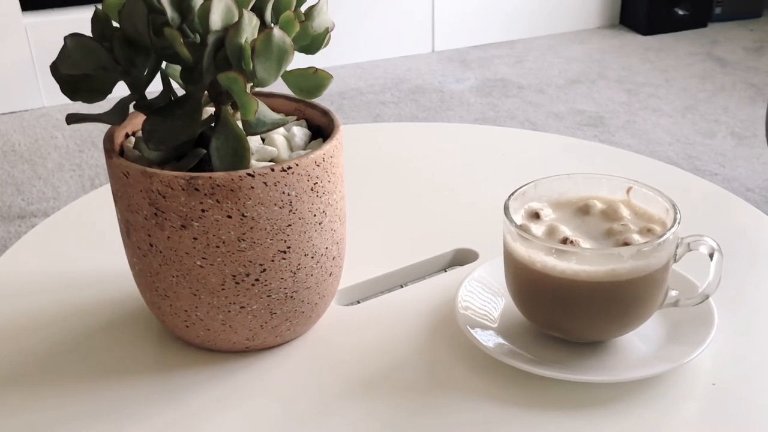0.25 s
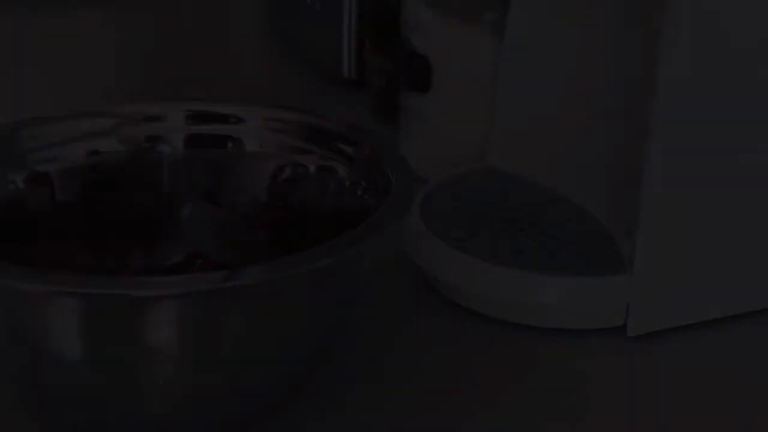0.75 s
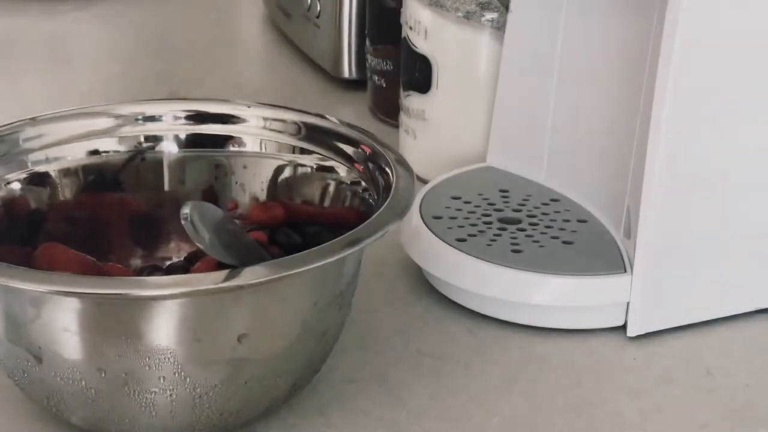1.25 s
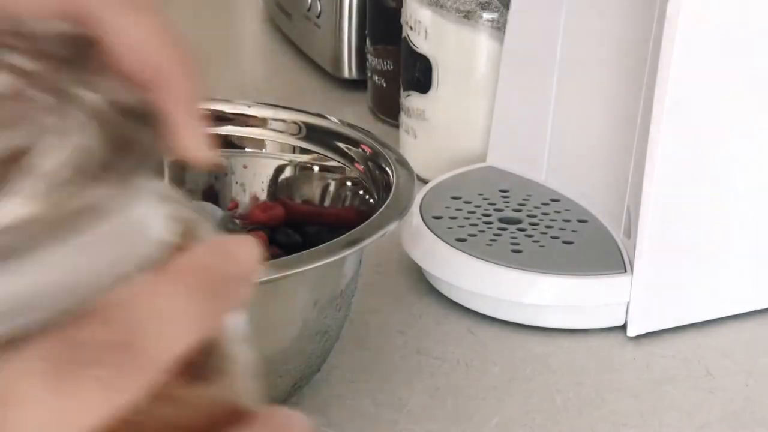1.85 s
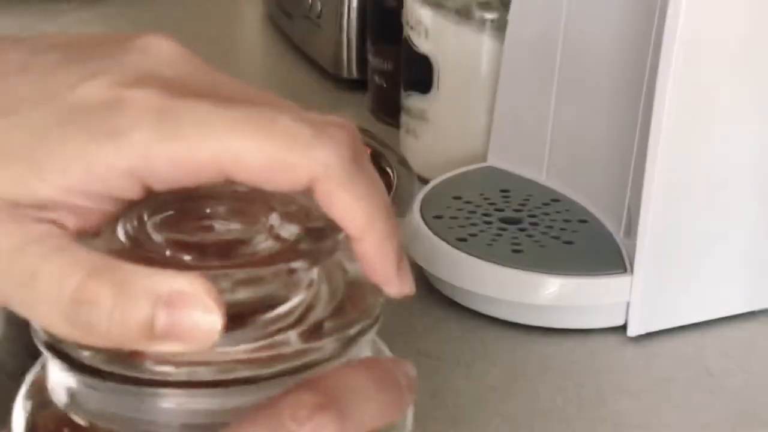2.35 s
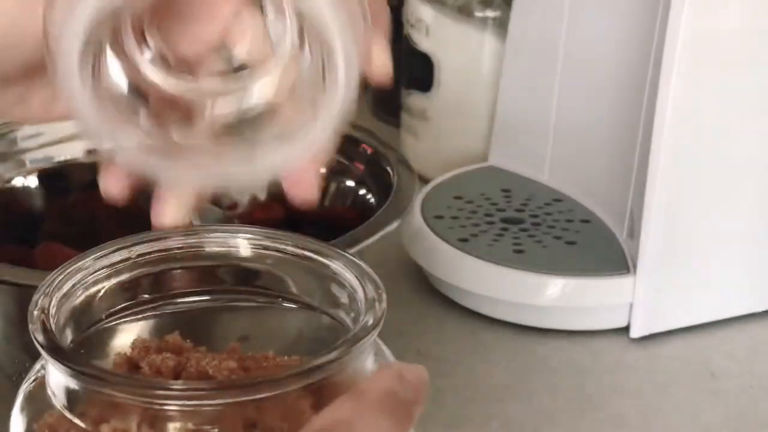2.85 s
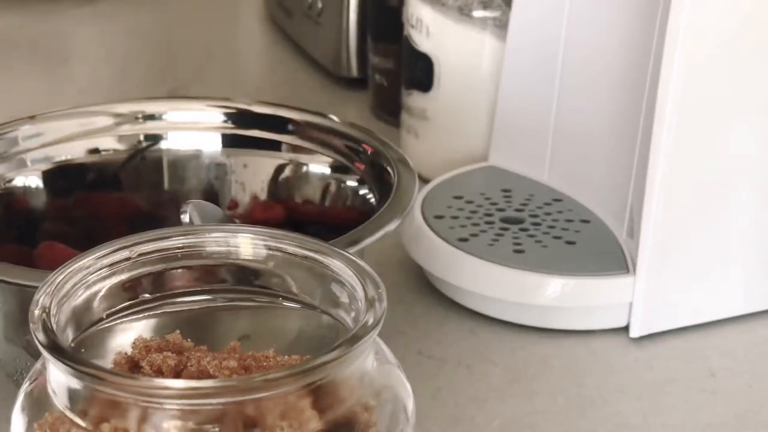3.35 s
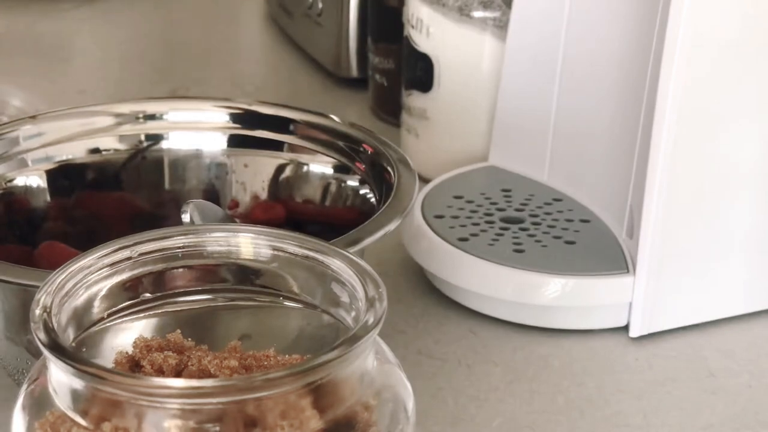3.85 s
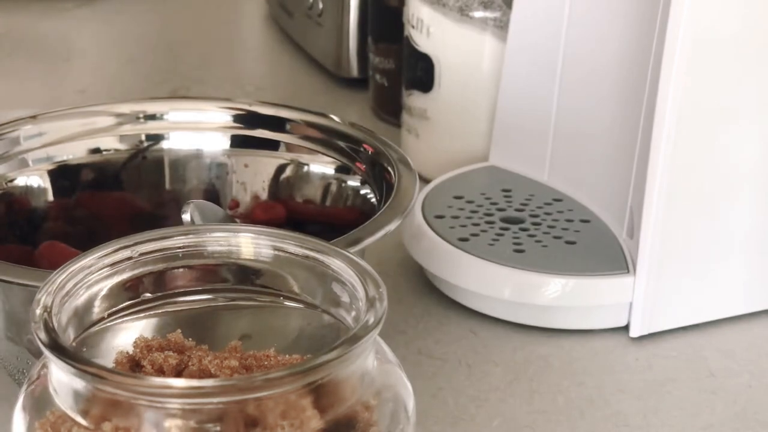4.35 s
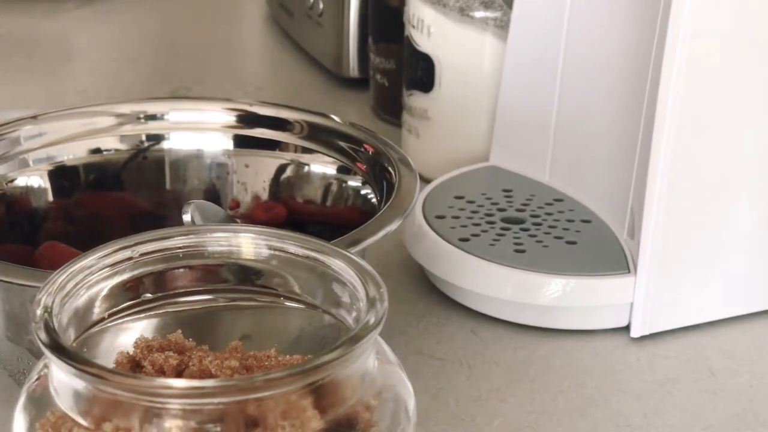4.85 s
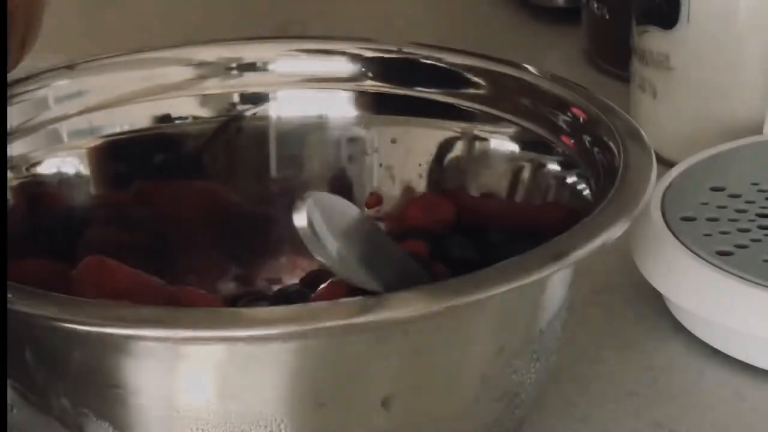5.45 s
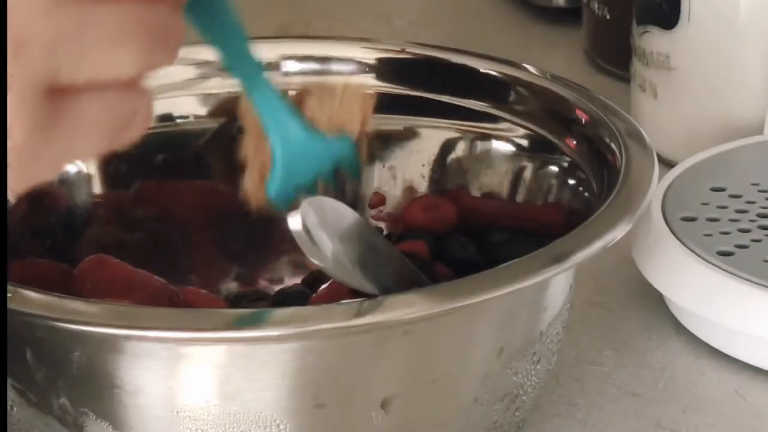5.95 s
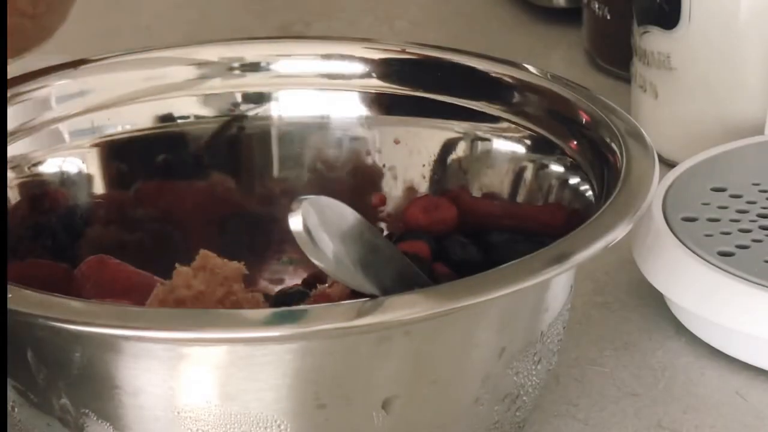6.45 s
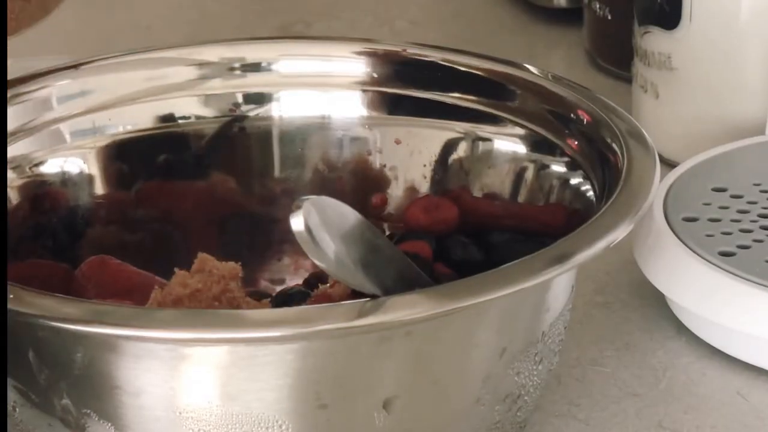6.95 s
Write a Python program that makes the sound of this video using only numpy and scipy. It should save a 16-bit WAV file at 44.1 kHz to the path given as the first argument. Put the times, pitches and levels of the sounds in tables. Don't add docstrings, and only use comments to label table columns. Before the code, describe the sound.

Very quiet room air with a faint thin squeak cuts abruptly to a low kitchen hum. Cloth and fingers rustle, a full glass jar thuds hard on the counter, and its lid pops open. The lid is laid aside in three low, glassy knocks with rumbling and gritty scraping. Finally a spoon gives one bright, short clink on a steel bowl, then a small light tap. Close microphone, small kitchen with short reverberation.

```python
import sys
import numpy as np
from scipy import signal
from scipy.fft import rfft, irfft, next_fast_len
from scipy.io import wavfile
from scipy.ndimage import uniform_filter1d

SR = 44100
rng = np.random.default_rng(int(sys.argv[2]) if len(sys.argv) > 2 else 0)


def volts_from_decibels(level):
    exponent = np.asarray(level, float) / 20
    return 10 ** exponent


def materialize(psi):
    bounded = np.clip(np.atleast_2d(psi).T, -1, 1)
    quanta = np.round(bounded * 32767).astype(np.int16)
    wavfile.write(sys.argv[1], SR, quanta)


N = 318181
KITCHEN_CUT_S, BOWL_CUT_S = 0.654, 4.93


def evened(x):
    return x / np.sqrt(np.mean(x ** 2) + 1e-20)


def read(points, hz):
    f, value = np.transpose(points)
    return np.interp(np.log(hz + 1), np.log(f + 1), value)


def add(mix, s, sound):
    part = mix[round(s * SR):][:len(sound)]
    part += sound[:len(part)]


def noise(spectrum, size):
    hz = np.fft.rfftfreq(size, 1 / SR)
    white = rfft(rng.standard_normal(size))
    return evened(irfft(white * volts_from_decibels(read(spectrum, hz)), size))


def long_noise(spectrum):
    return noise(spectrum, next_fast_len(N))[:N]


def flicker(samples, size):
    once = uniform_filter1d(rng.standard_normal(size), samples)
    return evened(uniform_filter1d(once, samples))


def fuzzy(hz, width_hz):
    r = np.exp(-np.pi * width_hz / SR)
    poles = [1, -2 * r * np.cos(2 * np.pi * hz / SR), r * r]
    return evened(signal.lfilter([1], poles, rng.standard_normal(N)))


# f/Hz, t60/s
TAIL_T60 = [(100, 0.87), (300, 0.28), (1000, 0.32), (3000, 0.28), (8000, 0.21), (15000, 0.15)]


def tail(spectrum, stretch, size):
    t, hz = np.arange(size) / SR, np.fft.rfftfreq(size, 1 / SR)
    z, out = rfft(noise(spectrum, size)), np.zeros(size)
    for centre_hz in 60 * 2. ** np.arange(9):
        band = np.maximum(1 - abs(np.log2((hz + 1) / centre_hz)), 0)
        swelling = 1 - np.exp(-(t * (centre_hz + 100) * 0.34) ** 2)
        decay = volts_from_decibels(-60 * t / (stretch * read(TAIL_T60, centre_hz)))
        out += irfft(z * band, size) * swelling * decay
    return out


# f/Hz, density/dB per Hz
FLAT = [(50, 0), (20000, 0)]


def echoed(ring, stretch):
    walls = tail(FLAT, stretch, size=8000)
    return signal.fftconvolve(ring, walls / np.linalg.norm(walls))[:len(ring)]


# f/Hz, density/dB per Hz
LIVING = [(12, -52), (20, -17), (50, -5.5), (130, 4), (198, -8.5), (234, -6), (558, -17), (1120, -23),
          (1260, -20), (1370, -26), (1570, -23), (2020, -29), (13500, -36), (16000, -37)]
KITCHEN = [(12, -54), (20, -16), (48, -10), (88, 2), (134, -7), (255, -19.5), (285, -13), (422, -18.5),
           (459, -22), (624, -22), (825, -25), (1120, -25), (1480, -31.5), (12400, -48.5), (16000, -48.5)]
LIVING_DB, KITCHEN_DB = -61, -52
# f/Hz, width/Hz, level/dB
HUM_BODY = [(58.8, 8.2, -60), (83.9, 11, -56.5), (140, 22.4, -57), (299.5, 26, -68), (632, 73, -92.5),
            (1130, 29, -82)]
# f/Hz, level/dB
WHINES = [(1297, -79.5), (3020, -87), (1190, -87.5), (4300, -90)]


def hum():
    t = np.arange(N) / SR
    kitchen = volts_from_decibels(KITCHEN_DB - 3) * long_noise(KITCHEN)
    for hz, width_hz, db in HUM_BODY:
        kitchen += volts_from_decibels(db) * fuzzy(hz, width_hz)
    for hz, db in WHINES:
        kitchen += volts_from_decibels(db + 2 + 3.1 * flicker(2000, N)) * np.sin(2 * np.pi * hz * t)
    return np.where(t < KITCHEN_CUT_S, volts_from_decibels(LIVING_DB) * long_noise(LIVING), kitchen)


# start t/s, length t/s, f/Hz, level/dB
SQUEAKS = [(0, 0.16, 1560, -77), (0, 0.62, 1297, -81.5), (0.666, 0.73, 3020, -81.5),
           (4.457, 0.48, 3020, -76.5), (0.512, 0.14, 1564, -76.5), (0.664, 0.19, 5830, -83),
           (.78, .1, 6800, -83), (0.67, 0.15, 4000, -79), (1.46, .15, 8700, -82), (2.385, .05, 14150, -80),
           (2.415, .098, 14000, -70), (2.859, 0.14, 6100, -80), (4.158, 0.045, 6160, -69),
           (4.2, .075, 6140, -76), (4.205, 0.048, 6800, -80), (5.58, 0.086, 8500, -77),
           (6.166, 0.14, 6370, -78), (6.263, 0.085, 6410, -72), (6.33, 0.11, 6370, -85),
           (6.948, 0.14, 5980, -86), (7, 0.037, 7750, -84), (7.06, 0.1, 8500, -82)]


def squeaks(mix):
    for s, length_s, hz, db in SQUEAKS:
        t = np.arange(round(length_s * SR)) / SR
        waver = volts_from_decibels(min(hz / 1800, 4.0) * flicker(250, len(t)))
        turns = hz * t + 0.054 * flicker(150, len(t))
        fade = signal.windows.tukey(len(t), min(hz / 9000, .5))
        add(mix, s, volts_from_decibels(db + 3) * waver * np.sin(2 * np.pi * turns) * fade)


def swell(t, start, peak, end, db):
    peak = max(peak, start + .004)
    up = np.sin(np.pi / 2 * np.clip((t - start) / (peak - start), 0, 1)) ** 1.9
    down = np.exp(-(2.08 * np.maximum(t - peak, 0) / max(end - peak, .02)) ** 1.57)
    return volts_from_decibels(db) * up * down * ((t < BOWL_CUT_S) | (start > BOWL_CUT_S))


def patchy(x):
    z = signal.stft(x, nperseg=256)[2]
    patches = uniform_filter1d(rng.standard_normal(z.T.shape), 20, 0)
    patches = uniform_filter1d(patches, 4, 1)
    return signal.istft(z * volts_from_decibels(2 * evened(patches.T)), nperseg=256)[1][:len(x)]


# f/Hz, density/dB per Hz
CLOTH = [(3500, -2.5), (5500, 4.5), (8000, 2), (12500, 0.5), (16000, -5.5)]
SKIN = [(600, 3.5), (1000, 6.5), (2000, 3), (3200, 1), (5000, -9), (7000, -24.5)]
RUMBLE = [(60, -22), (120, 14), (200, 2), (330, 4.5), (550, -6.5), (800, -4), (1200, -43.5)]
SILK = [(5000, -29), (7500, -2), (9000, -2.5), (10500, -0.5), (12500, 3), (14000, -3), (16000, -6)]
# t/s, effort level/dB
EFFORT = [(.66, -79), (.95, -84), (1.4, -78), (2.1, -59), (2.42, -68.5), (2.75, -80), (3.0, -66.5),
          (3.35, -60.5), (3.6, -69.5), (3.92, -40.5), (4.2, -45), (4.45, -49.5), (4.62, -50.5),
          (4.925, -57.5), (4.935, -73), (5.4, -63), (5.95, -78), (7.21, -65.5)]
# level/dB at full effort, slope/dB per dB
FOLLOW = [
    (-70.5, 0.32),
    (-59.5, 0.47),
    (-47, 0.97),
]
FULL_EFFORT_DB = -44.5
# start t/s, peak t/s, end t/s, level/dB
SWISHES = [(.68, .71, 0.74, -76), (1.172, 1.19, 1.37, -67), (1.278, 1.292, 1.39, -62),
           (1.36, 1.51, 1.9, -68.5), (1.55, 1.87, 2.5, -62), (1.88, 1.92, 1.88, -58),
           (2.29, 2.355, 2.47, -61.5), (2.42, 2.45, 3.6, -74), (2.51, 2.545, 2.57, -59),
           (2.59, 2.635, 2.74, -66), (2.77, 2.83, 2.95, -73), (2.85, 2.97, 3.4, -75),
           (3.11, 3.165, 3.36, -71), (3.24, 3.34, 3.67, -63), (3.39, 3.47, 3.54, -55), (3.63, 3.69, 4, -69),
           (3.95, 3.985, 4.04, -62), (4.1, 4.115, 4.17, -61), (4.565, 4.58, 4.85, -64),
           (4.7, 4.89, 6, -62.5), (4.935, 5.14, 6.7, -68.5), (5.228, 5.245, 5.45, -59),
           (6.83, 6.85, 7, -66), (6.95, 7.07, 7.15, -78)]
SCRAPES = [(1.158, 1.18, 2.3, -71.5), (1.866, 1.915, 2.01, -55), (2.302, 2.356, 2.44, -60.5),
           (2.521, 2.55, 2.7, -64), (3.258, 3.34, 3.7, -62), (3.368, 3.41, 3.5, -57.5),
           (3.936, 3.977, 4.08, -54), (4.033, 4.083, 4.26, -57.5), (4.555, 4.577, 4.68, -54),
           (4.803, 4.914, 5.4, -66), (5.232, 5.249, 5.29, -52.5), (5.548, 5.75, 6.3, -73)]
SHOVES = [(2.22, 2.302, 2.5, -47), (2.562, 2.617, 2.57, -58), (3.31, 3.343, 4.1, -55),
          (3.38, 3.438, 3.47, -53), (3.527, 3.573, 2.6, -58), (3.895, 3.938, 3.88, -38),
          (4.034, 4.098, 4.18, -40), (4.5, 4.543, 4.74, -47), (4.575, 4.622, 4.7, -43.5),
          (4.7, 4.78, 4.99, -52.5)]
BRUSHES = [(1.164, 1.186, 1.1, -70), (1.265, 1.293, 1.42, -61.5), (1.7, 1.903, 1.75, -62),
           (2.143, 2.152, 2.2, -54), (2.81, 2.83, 2.9, -69), (3.14, 3.165, 3.44, -70),
           (3.43, 3.468, 3.62, -60.5), (3.98, 4.01, 3.8, -66), (4.12, 4.137, 4.2, -55),
           (4.24, 4.265, 3.9, -70), (4.417, 4.43, 4.66, -64), (4.6, 4.635, 4.76, -69),
           (7.04, 7.08, 7.12, -75.5)]


def hands():
    t = np.arange(0, N + 64, 64) / SR
    now = np.arange(N) / SR
    effort_db = np.interp(t, *np.transpose(EFFORT)) - FULL_EFFORT_DB
    cloth, skin, counter = (volts_from_decibels(db + slope * effort_db) ** 2 for db, slope in FOLLOW)
    swish, scrape, shove, brush = (sum(swell(t, *row) ** 2 for row in rows)
                                   for rows in (SWISHES, SCRAPES, SHOVES, BRUSHES))
    skin_in_swish = volts_from_decibels(2 * -9.5) * swish
    layers = [  # colour, power, grain dB, grain samples
        (CLOTH, cloth + swish, 1.2, 30),
        (SKIN, skin + scrape + skin_in_swish, 1.74, 80),
        (RUMBLE, counter + shove, 2.2, 400),
        (SILK, brush, 1.1, 30)]
    rub = 0
    for colour, power, grain_db, grain_n in layers:
        level = np.interp(now, t, np.sqrt(power))
        rub = rub + long_noise(colour) * level * volts_from_decibels(grain_db * flicker(grain_n, N))
    return patchy(rub) * (now > KITCHEN_CUT_S)


def tick(s, db, hz, second_hz, t60, tail_db):
    t = np.arange(8000) / SR
    low, high = sorted((hz, second_hz))
    rise = 1 - np.exp(-(t * low * 1.57) ** 2)
    ring = np.sin(2 * np.pi * hz * t) + 0.31 * np.sin(2 * np.pi * second_hz * t)
    ring *= volts_from_decibels(db - 60 * t / t60) * rise
    colour = [(low / 1.8, -30), (low, 0), (high, 0), (high * 2.0, -25), (high * 4, -60)]
    snap = rise * volts_from_decibels(db - 9.0 - 60 * t / 0.0059) * noise(colour, len(t))
    room = volts_from_decibels(tail_db) * tail(colour, 0.31, size=len(t))
    return s, ring + snap + volts_from_decibels(-8.5) * echoed(ring, 0.92) + room


# t/s, peak level/dB, f/Hz, second f/Hz, tail level/dB
HELD = [(1.287, -44, 1130, 4000, -68), (2.251, -42, 3000, 9200, -67), (2.251, -46, 13500, 9200, -65),
        (2.5121, -22, 5550, 4770, -50), (2.5123, -20.5, 2826, 1490, -60), (2.5122, -33, 7600, 9300, -60),
        (2.5165, -23.5, 2650, 1500, -66), (2.5122, -33, 1500, 1100, -66), (2.6365, -33.5, 195, 130, -66),
        (4.523, -29.5, 345, 140, -54), (4.61, -42, 130, 768, -68), (5.2366, -33.5, 1200, 2900, -76),
        (5.2366, -41, 3000, 6500, -66), (6.8036, -34, 1950, 2230, -62), (6.804, -35, 5000, 5500, -60)]
RESTING = [(.620, -44, 5950, 7300, -59), (1.186, -54, 2980, 6500, -68), (2.4455, -53, 5960, 3200, -69),
           (2.4455, -61, 8500, 10500, -75), (2.576, -49, 3080, 3450, -63), (3.43, -48, 1340, 350, -50),
           (4.089, -43, 3300, 3900, -70), (4.27, -52, 2270, 3030, -72), (4.323, -50, 1910, 3380, -56),
           (4.4012, -47, 3160, 1860, -53), (4.4012, -54, 5000, 7000, -68), (4.57, -46, 4570, 7200, -51.5),
           (5.236, -46.5, 6340, 8900, -62), (5.878, -63, 2840, 2330, -68)]
FREE = [(1.2866, -54, 8100, 9100, -60), (2.541, -54, 11500, 9000, -58), (3.327, -50, 8900, 2740, -56.5),
        (3.341, -46.5, 1190, 2690, -70), (3.537, -60, 11100, 6960, -67), (3.9795, -48, 4737, 3200, -69),
        (3.988, -50, 6100, 4730, -62), (4.5696, -39.5, 3180, 1210, -52), (4.111, -50, 6000, 6900, -60),
        (6.8024, -33.5, 6800, 8300, -44.5), (6.803, -39, 15300, 15250, -54), (3.817, -46, 12900, 4300, -58),
        (3.877, -48, 12800, 3000, -62), (5.404, -46, 15400, 13500, -62), (6.8035, -35, 12100, 12900, -50)]
GRIT = [(1.1238, -58, 2990, 4000, -75), (1.298, -52, 11500, 9000, -68), (1.909, -50, 2370, 3500, -62),
        (2.3365, -54, 1520, 3000, -72), (2.9676, -54, 3010, 6000, -75), (3.0953, -55, 2860, 4000, -71),
        (3.4011, -52, 2740, 1500, -66), (3.9792, -40, 2610, 6100, -60), (3.986, -50, 3300, 2300, -64),
        (4.053, -53, 3270, 5500, -68), (4.1153, -48, 2830, 6010, -62), (4.33, -52, 2530, 4500, -68),
        (4.486, -53, 2242, 3100, -64), (4.6097, -48, 2800, 3300, -58), (4.7818, -56, 3100, 2210, -65),
        (5.2545, -47, 4700, 7000, -62)]


def touches(mix):
    for rows, cycles in ((HELD, 12.6), (RESTING, 39), (FREE, 84), (GRIT, 32)):
        for s, db, hz, second_hz, tail_db in rows:
            add(mix, *tick(s, db, hz, second_hz, cycles / hz, tail_db))


def blow(row, modes, crack, lag_s, spread, crack_hz, crack_t60, stretch, soft=2.25):
    s, ring_db, crack_db, tail_db = row
    t, ring = np.arange(16000) / SR, 0
    for hz, db, t60 in modes:
        late = np.maximum(t - lag_s * (500 / hz) ** spread, 0)
        rise = 1 - np.exp(-late * hz * soft)
        ring = ring + volts_from_decibels(db - 60 * late / t60) * rise * np.sin(2 * np.pi * hz * late)
    ring = ring + volts_from_decibels(-18.0) * echoed(ring, 0.4)
    treble = signal.butter(2, crack_hz, "high", fs=SR)
    snap = evened(signal.lfilter(*treble, noise(crack, len(t))))
    contact = 1 - np.exp(-(t / .0003) ** 2)
    snap = snap * volts_from_decibels(crack_db - 60 * t / crack_t60) * contact
    early = 1 + 1.2 * np.exp(-t / .015)
    return s, volts_from_decibels(ring_db) * ring + snap + volts_from_decibels(tail_db) * early * tail(crack, stretch, size=len(t))


# t/s, ring level/dB, crack level/dB, tail level/dB
BOWL_BLOWS = [
    (5.404, -30.5, -38, -44),
    (5.407, -66, -29, -63),
]
SPOON_BLOWS = [
    (5.496, -64, -72, -63),
    (5.5132, -46, -72, -57.5),
    (5.536, -64, -72, -68),
]
LATE_SWELL = (5.518, -47, -80, -70)
# level/dB, t60/s
BOWL_HZ = [120, 673, 1324, 1890, 2415, 3056, 3774, 4490, 4524, 4544, 5213, 5232, 5860, 5927, 6476, 7036,
           7850, 8300, 8720, 9738, 11700]
BOWL_RING = [(-5.5, 0.12), (-13, 0.2), (-20, 0.3), (-18, 0.2), (-16.5, 0.31), (-12, 0.23), (-14, .17),
             (-1, 0.14), (-12, 0.25), (-32, 0.11), (-17, .16), (-16, 0.19), (2.5, 0.043), (-23, 0.31),
             (-20, .1), (-10, 0.069), (-1, 0.031), (3, 0.024), (4.5, 0.015), (-22, .06), (-2, 0.013)]
# f/Hz, level/dB, t60/s
SPOON = [(5222, 2, .05), (5246, -11, .2), (5927, -5, .06), (7031, -14, .08), (7768, -10, .045),
         (8300, -14, .03), (4490, -14, .1)]
LOWER_PAIR = [(4490, 0, .07), (4520, -8, .15)]
# f/Hz, density/dB per Hz
BRIGHT_CRACK = [(300, 1.5), (2000, -10), (3500, -34), (5000, -0.5), (6000, 0), (8500, -3.5), (12000, -11),
                (16000, -18)]


def spoon_on_bowl(mix):
    bowl = [(hz, *ring) for hz, ring in zip(BOWL_HZ, BOWL_RING)]
    for row in BOWL_BLOWS:
        add(mix, *blow(row, bowl, BRIGHT_CRACK, lag_s=0.001, spread=0.49,
                       crack_hz=2560, crack_t60=0.021, stretch=1.0))
    for row in SPOON_BLOWS:
        add(mix, *blow(row, SPOON, BRIGHT_CRACK, lag_s=0.00058, spread=0.76,
                       crack_hz=3506, crack_t60=.03, stretch=0.74, soft=.15))
    add(mix, *blow(LATE_SWELL, LOWER_PAIR, BRIGHT_CRACK, lag_s=.0005, spread=.6,
                   crack_hz=3500, crack_t60=.03, stretch=.7, soft=.05))


# t/s, ring level/dB, crack level/dB, tail level/dB
LID_BLOWS = [
    (3.816, -12.5, -33, -30.5),
    (3.8765, -16.5, -44, -32),
    (4.127, -12.5, -35, -28),
]
SHIVERS = [
    (3.818, -52, -80, -80),
    (3.878, -50, -80, -80),
    (3.976, -54, -80, -80),
]
# f/Hz, level/dB, t60/s
LID = [(130, -22, 0.26), (303, -5.5, 0.055), (365, -15.5, 0.15), (440, -17, 0.14), (559, -2, 0.049),
       (217.5, -13, 0.11), (692.5, -2, 0.042), (892, -12, 0.037), (1045, -10.5, 0.053), (1430, -16, 0.084),
       (1680, -22, 0.036), (2386, -20.5, 0.046), (2900, -11, .012), (3170, -16, 0.02), (4310, -19.5, 0.011)]
LID_SWING = [(600, 9, .012), (1100, -5, .008)]
LID_GLASS = [(12850, 0, .08), (6150, -4, .09), (8500, -8, .07), (4720, -6, .05), (3300, -8, .05)]
# f/Hz, density/dB per Hz
LID_CRACK = [(88, -29), (150, -16), (566, -1), (1260, -18.5), (1390, -18), (1900, -24.5), (2450, -28.5),
             (3770, -33.5), (4160, -34.5), (12900, -49.5), (16000, -56)]


def lid_laid_aside(mix):
    for row in LID_BLOWS:
        add(mix, *blow(row, LID + LID_SWING, LID_CRACK, lag_s=0.00376, spread=0.563,
                       crack_hz=1810, crack_t60=0.06, stretch=1.0))
    for row in SHIVERS:
        add(mix, *blow(row, LID_GLASS, BRIGHT_CRACK, lag_s=.0005, spread=.6,
                       crack_hz=3500, crack_t60=.03, stretch=.7, soft=.1))


# t/s, ring level/dB, crack level/dB, tail level/dB
JAR_BLOWS = [
    (2.142, -5.5, -20.5, -20.5),
    (2.154, -21.5, -28, -38),
]
# f/Hz, level/dB, t60/s
COUNTER = [(80.7, -7.5, 0.23), (125.4, 2, 0.15), (175.2, -11.5, 0.156), (195, -2, 0.093), (212, -15, 0.46),
           (248.6, -21, .2), (291, -13, .12), (318.7, -19.5, 0.18), (361, -18.5, .25), (417, -12, 0.11),
           (490, -21.5, 0.23), (570, -23, 0.28), (634, -17, 0.12), (706, -11, .09), ]
JAR_SWING = [(350, 15, .012), (765, -7, 0.01), (1130, -11, 0.018), (913, -20.5, .14), (982, -17, .12),
             (788, -20.5, .2), (1230, -28, 0.12), (1599, -24, 0.09)]
# f/Hz, density/dB per Hz
JAR_CRACK = [(88, -40), (150, -9), (414, -5.5), (612, -14), (979, -18), (1360, -23.5), (2650, -32),
             (2980, -33), (5250, -39.5), (12200, -49), (16000, -55)]


def jar_set_down(mix):
    for row in JAR_BLOWS:
        add(mix, *blow(row, COUNTER + JAR_SWING, JAR_CRACK, lag_s=0.00274, spread=0.63,
                       crack_hz=710, crack_t60=0.069, stretch=1.05))


def scene():
    mix = hum() + hands()
    squeaks(mix)
    touches(mix)
    spoon_on_bowl(mix)
    lid_laid_aside(mix)
    jar_set_down(mix)
    return mix[None]


def roll_off(x):
    return signal.sosfilt(signal.butter(12, 16650, fs=SR, output="sos"), x)


def record(dry):
    bass_cut = signal.butter(4, 45., "high", fs=SR, output="sos")
    top_cut = signal.firwin(511, 15620., fs=SR)
    heard = signal.oaconvolve(signal.sosfilt(bass_cut, dry), top_cut[None], "same")
    return roll_off(2 * np.tanh(heard / 2))


dry = scene()
out = record(dry)
materialize(out)
```